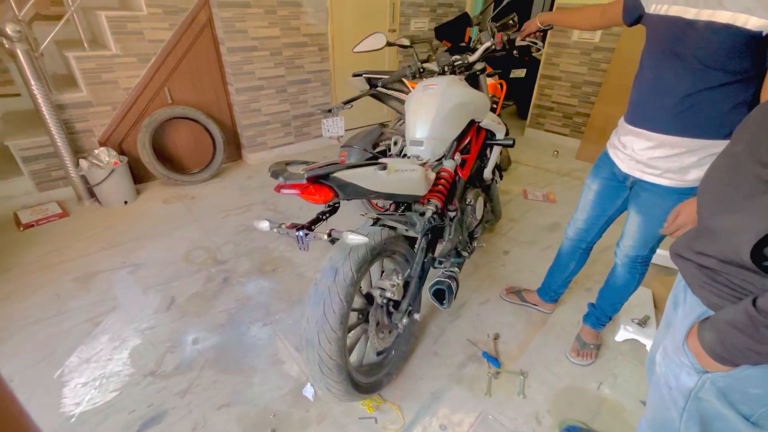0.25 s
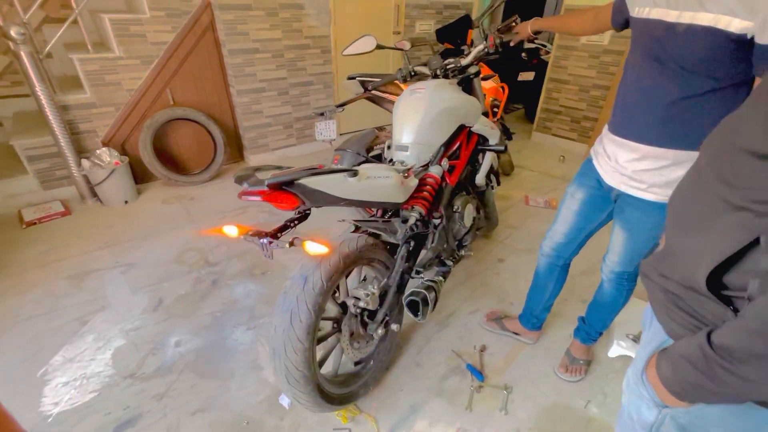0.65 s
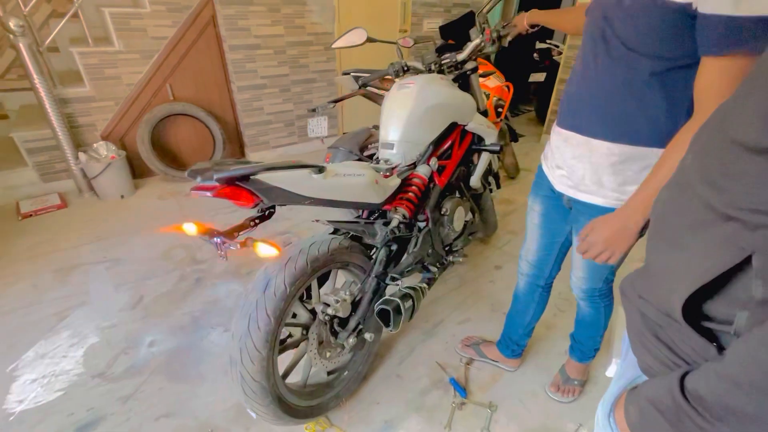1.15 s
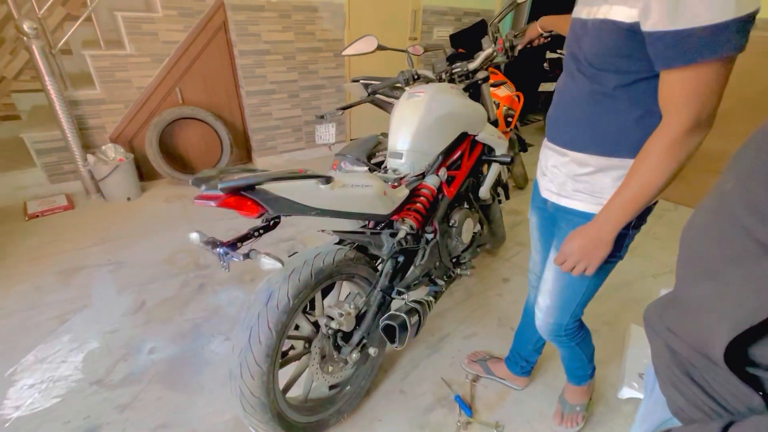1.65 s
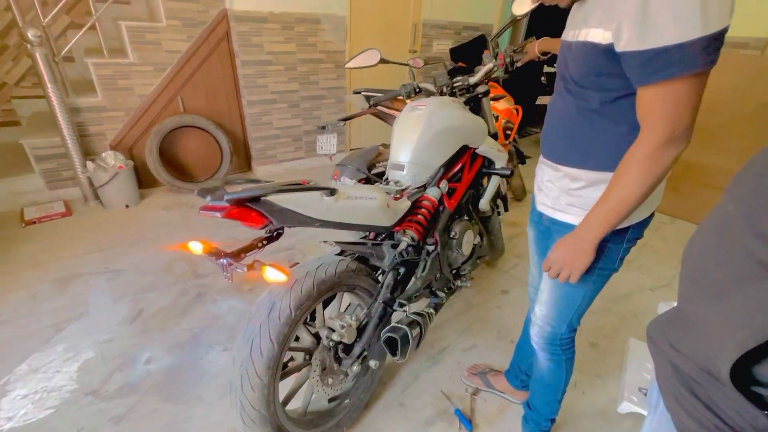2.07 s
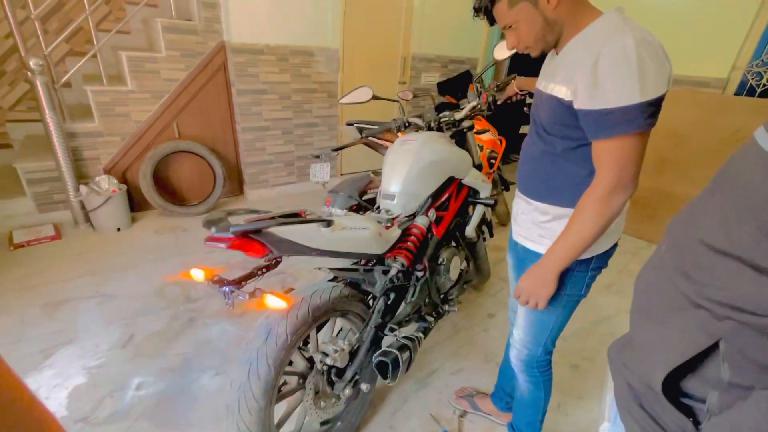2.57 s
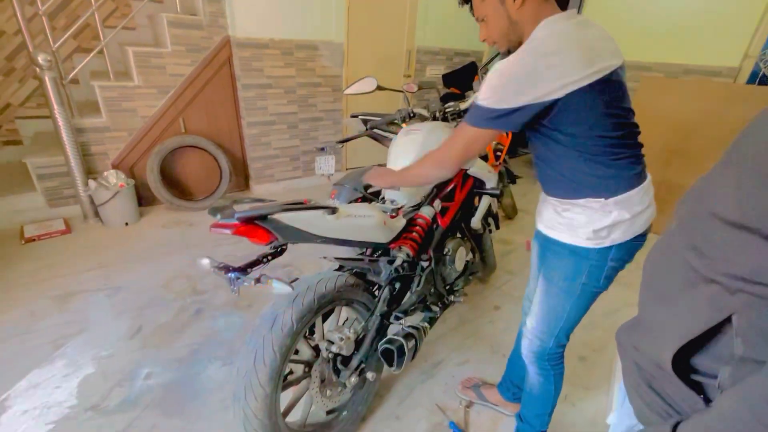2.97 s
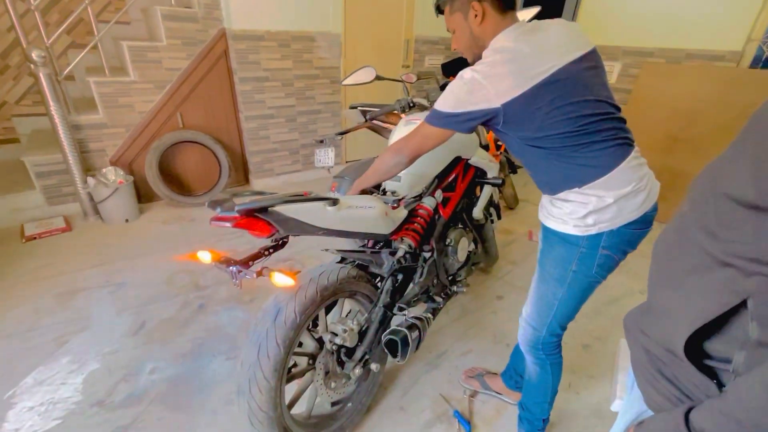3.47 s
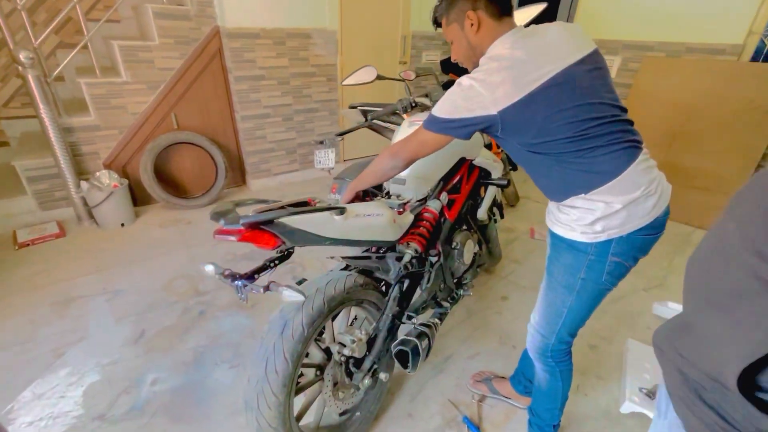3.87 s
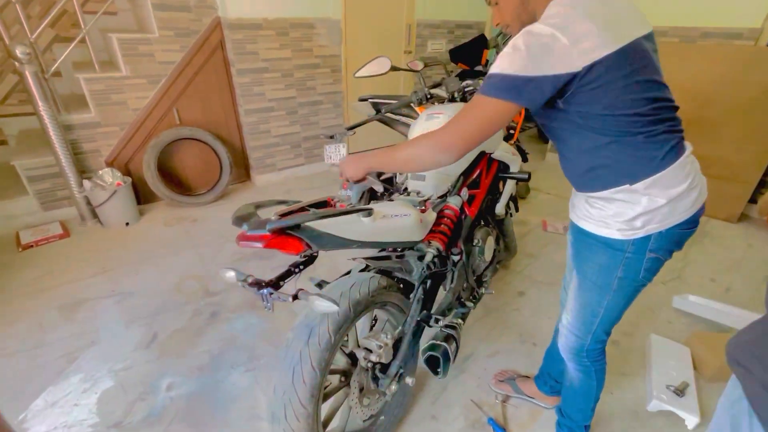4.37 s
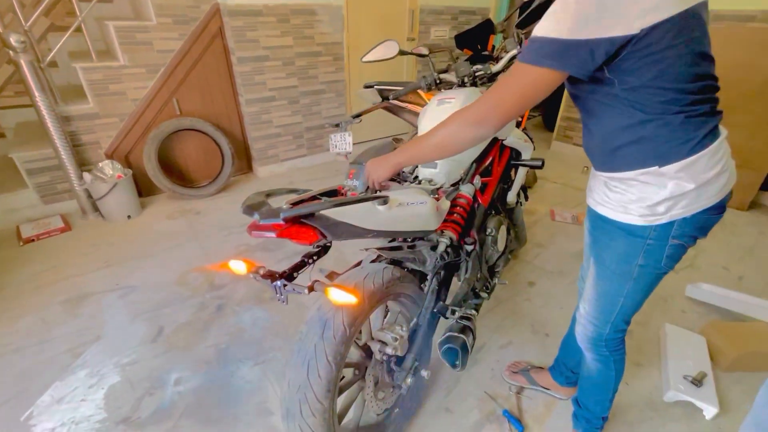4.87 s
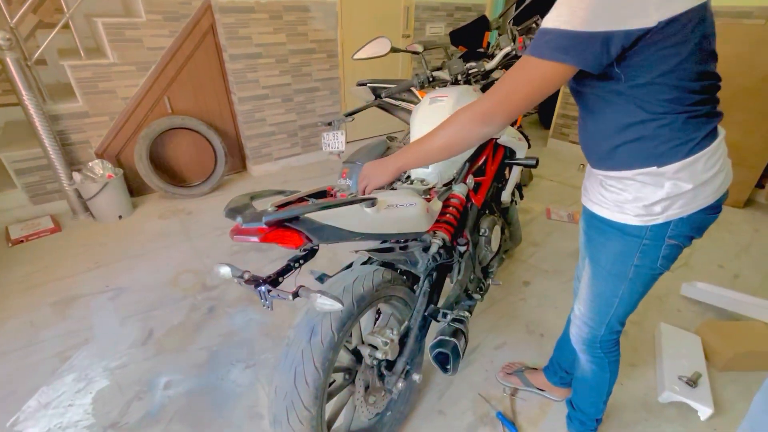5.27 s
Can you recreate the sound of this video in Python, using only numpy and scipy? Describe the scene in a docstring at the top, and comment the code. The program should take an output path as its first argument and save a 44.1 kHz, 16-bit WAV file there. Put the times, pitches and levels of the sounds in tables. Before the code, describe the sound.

A twin-cylinder motorcycle winds down toward idle, then is revved three times in quick succession through a loud open exhaust. Each blip rises in pitch with a boom, a bark and sharp spitting over a rush of gas. The engine sinks to a throbbing idle with a few lone pops, then gets three more blips. The hard-walled garage echoes and rings low, heard in stereo.

```python
"""A twin-cylinder motorcycle idles and is revved six times through an open pipe in a hard-walled garage.
Each exhaust stroke pushes out gas, making low tones and a throb over a steady rush and hiss.
When the stroke carries burnt fuel (the charge), it adds a boom, a bark and a short, sharp spit.
As the engine slows with the throttle shut, only a few lone pops fire. The garage echoes and rings
at its own low notes, and two microphones hear it differently."""
import sys
import numpy as np
from scipy import signal
from scipy.fft import rfft, irfft
from scipy.io import wavfile
from scipy.ndimage import uniform_filter1d

SR = 44100
rng = np.random.default_rng(int(sys.argv[2]) if len(sys.argv) > 2 else 0)


def unload_audio(sound):
    """Save the sound as a 16-bit wav file, at the path given as the first command line argument."""
    columns = np.transpose(np.atleast_2d(sound))
    # keep every value between -1 and 1, then stretch to whole-number steps
    steps = np.round(np.clip(columns, -1, 1) * 32767)
    wavfile.write(sys.argv[1], SR, steps.astype(np.int16))


N = 243431
T = np.arange(N) / SR

# Twists of the throttle: opens/s, full/s, eases/s, shuts/s, charge/dB (at opening, full, shutting),
# spit/dB (at the same three moments), boost of the second tone afterwards/dB
BLIPS = [(0.613, .78, 0.82, 0.92, -39, -11, -29.5, -48.5, -43.5, -62, 2.5),
         (1.115, 1.3, 1.356, 1.41, -29.5, -5.5, -17.5, -60.5, -38.5, -60, -1.5),
         (1.843, 2.056, 2.135, 2.235, -30, -3, -22, -61, -32, -64, 1.5),
         (3.92, 4.208, 4.25, 4.373, -40.5, -1.5, -39.5, -65.5, -32.5, -64, 3),
         (4.591, 4.646, 4.753, 4.893, -9.5, -2.5, -10, -55, -31, -52, 3.5),
         (5.334, 5.404, 5.5, 5.6, -13.5, -2, -3, -47, -33, -44, .1)]


def gain_of(db):
    """Turn decibels into a factor to multiply by."""
    return 10 ** (np.asarray(db) / 20)


def read(points, hz):
    """Look up a pitch in a table, joining its points with straight lines on an octave scale."""
    f, value = np.transpose(points)
    return np.interp(np.log(hz + 1), np.log(f + 1), value)


def coloured(x, points):
    """Shape a sound's lows and highs; the table sets their balance, not the overall loudness."""
    hz = abs(np.fft.fftfreq(8192, 1 / SR))
    log_gain = np.log(gain_of(np.maximum(read(points, hz), -100)))
    taps = np.fft.ifft(np.exp(np.conj(signal.hilbert(log_gain)))).real[:4096]  # rings only after a hit
    return signal.oaconvolve(x, taps / np.linalg.norm(taps))[:N]


def passed(x, hz, kind):
    """Keep only the "low" or the "high" side of a frequency."""
    return signal.sosfilt(signal.butter(4, hz, kind, fs=SR, output="sos"), x)


def speed():
    """How many exhaust strokes the engine makes each second."""
    # Engine speed: t/s, stroke rate/Hz
    rates = [(0, 71.76), (.2, 54.72), (.332, 46.1), (.451, 31.54), (.605, 28.91), (.806, 71.99),
             (.871, 78.18), (.975, 69.78), (1.13, 49.73), (1.196, 59.17), (1.337, 93.66), (1.397, 101.5),
             (1.797, 57.57), (1.86, 49.95), (1.935, 62.35), (2.112, 108.9), (2.188, 118.0), (2.476, 81.38),
             (2.953, 35.2), (3.05, 27.1), (3.2, 27.1), (3.45, 28.7), (3.941, 28.8), (4.084, 58.96),
             (4.236, 99.79), (4.301, 112.67), (4.607, 79.77), (4.762, 118.12), (4.858, 136.18),
             (5.31, 79.19), (5.366, 81.5), (5.461, 109.14), (5.52, 117.33)]
    return np.interp(T, *np.transpose(rates))


def lively(idle_hz=29, per_octave=.62):
    """0 at idle, 1 when the engine runs fast."""
    return np.clip(per_octave * np.log2(speed() / idle_hz), 0, 1)


def crank():
    """The turning engine: a running count of strokes, and one click for each."""
    hz = speed()
    count = .865 + np.cumsum(hz) / SR
    strokes = np.diff(np.floor(count), prepend=0) * np.sqrt(SR / hz)  # same power at any speed
    return count, strokes


def charge(rise_bend=.57, fall_bend=1.1):
    """Charge and spit levels in dB: both grow as the throttle opens, sink, and stop when it shuts."""
    out = np.full((2, N), -200.)
    for opens, full, eases, shuts, *levels_db, _ in BLIPS:
        rise = np.clip((T - opens) / (full - opens), 0, 1) ** rise_bend
        fall = np.clip((T - eases) / (shuts - eases), 0, 1) ** fall_bend
        rows_db = [np.interp(rise + fall, [0, 1, 2], part) for part in (levels_db[:3], levels_db[3:])]
        out = np.where((T > opens) & (T <= shuts), rows_db, out)
    return out


def flow(sound, fade_db_per_s=144):
    """Strength of the gas flow: a steady floor, a part that follows speed and one that trails the charge."""
    # Rows for throb, rush and hiss: floor/dB, level at 80 Hz/dB, rise/dB per octave of speed,
    # level at full charge/dB, rise/dB per dB of charge
    flows = [(-28, -26.5, 5, -18, 2), (-48.5, -41.5, 12.5, -30, 0.4), (-69, -55.5, 11.5, -32, 4)]
    floor_db, base_db, octave_db, full_db, slope = flows[["throb", "rush", "hiss"].index(sound)]
    fade_db = fade_db_per_s * T
    lingering_db = np.maximum.accumulate(charge()[0] + fade_db) - fade_db
    speed_db = base_db + octave_db * np.log2(speed() / 80)
    parts_db = [np.full(N, floor_db), speed_db, full_db + slope * lingering_db]
    return np.linalg.norm(gain_of(parts_db), axis=0)


def waver(depth_db):
    """Uneven running makes a tone swell and sink, a little differently left and right."""
    drift = uniform_filter1d(uniform_filter1d(rng.standard_normal((3, N)), size=1500), size=1500)
    return gain_of(depth_db * (drift[0] + .78 * drift[1:]) / drift.std())


def pipe_tone(count, multiple, empty_db=-40):
    """The gas in the pipe sings at a multiple of the stroke rate."""
    # Multiples 1 to 4: level/dB, extra at full charge/dB, change/dB per octave of speed from 80 Hz
    tones = [(-2.5, 3, -5.5), (-5, -2, 0.5), (-14.5, 17, -3.7), (-15, 8, -2.5)]
    # How well pipe and garage carry a tone: f/Hz, level/dB
    carry = [(25, -53), (45, -24.5), (57, -23.5), (70, -27.5), (84, -22), (100, -27), (128, -29),
             (152, -15.5), (172, -20), (192, -13), (212, -17), (226, -18), (243, -26.5), (266, -20),
             (292, -25), (328, -18), (360, -38), (395, -12.5), (440, -15), (520, -21)]
    base_db, loaded_db, octave_db = tones[multiple - 1]
    level_db = read(carry, multiple * speed()) + base_db + octave_db * np.log2(speed() / 80)
    load = np.clip(1 - charge()[0] / empty_db, 0, 1)
    blips_done = np.searchsorted([row[3] for row in BLIPS], T)
    boost_db = np.array([0] + [row[-1] for row in BLIPS])[blips_done]
    coasting_db = boost_db * lively() * (load == 0) * (multiple == 2)
    level_db += uniform_filter1d(loaded_db * load + coasting_db, size=2000)
    wave = np.sin(2 * np.pi * multiple * count + multiple ** 2)
    return gain_of(level_db) * waver(depth_db=.4 + 1.3 * lively()) * wave


def uneven(strokes, spread_db):
    """No two strokes are equally strong."""
    return strokes * gain_of(spread_db * np.clip(rng.standard_normal(N), -2, 2))


def puffs(strokes, rise_s, fall_s):
    """A burst of noisy gas follows each stroke."""
    t = T[:2000]
    shape = (1 - np.exp(-t / rise_s)) * np.exp(-t / fall_s)
    return signal.oaconvolve(strokes, shape / np.linalg.norm(shape))[:N] * rng.standard_normal(N)


def garage_ring(x, build_s):
    """The garage's own low notes build up as echoes gather, then die away."""
    # The notes (wider ones die sooner): f/Hz, width/Hz
    notes = [(57, 11), (84, 13), (115, 15), (148, 9), (167, 9), (193, 10), (226, 8), (266, 7), (303, 10),
             (328, 8), (395, 7), (430, 9), (486, 8), (547, 10), (625, 11), (693, 12)]
    # How each note reaches the microphones: left/dB, right/dB, right phase/rad
    reach = [(13, 15, 0.23), (2.5, -2.5, 0.33), (-5.5, -8.5, -0.5), (-1.5, 3.5, 0.83), (3.5, -4.5, 0.73),
             (7, 2.5, 1), (4.5, -0.5, -1.55), (4.5, 1.5, 0.87), (-1, -5, 0.33), (1.5, -0.5, 0.77),
             (2.5, 0.5, 0.75), (2.5, -1, 1.7), (-5.5, 1.5, 1.44), (-17, -1, -0.7), (-1.5, -14.5, 2),
             (-11, -6.5, -1.3)]
    t, ring = T[:SR // 2], np.zeros((2, SR // 2))
    for k, ((hz, width), (left_db, right_db, phase)) in enumerate(zip(notes, reach)):
        swing = np.sin(2 * np.pi * hz * t + np.array([[0], [phase]]))
        fade = width * np.exp(-np.pi * width * t)
        ring += (-1) ** k * gain_of([[left_db], [right_db]]) * fade * swing  # neighbours flip sign
    ring *= 1 - np.exp(-t / build_s)
    return signal.oaconvolve(x[None], ring / np.linalg.norm(ring[0]), axes=1)[:, :N]


def throb(strokes, dull_hz=354.5, thin_hz=72.3):
    """Each stroke and the swirling gas behind it set the garage ringing."""
    # Colour of the throb: f/Hz, level/dB
    colour = [(40, -40), (80, -2), (140, 2.5), (220, -7.5), (330, -5), (420, -8.5), (520, -14.5),
              (800, -74)]
    thumps = uneven(strokes, spread_db=2.5)
    swirl = (1 - .25 * lively()) * gain_of(-5) * puffs(strokes, rise_s=.004, fall_s=.015)
    pulses = coloured(gain_of(-14) * flow("throb") * (thumps + swirl), colour)
    slow = (1 - lively()) * passed(pulses, dull_hz, "low")
    fast = lively() * passed(pulses, thin_hz, "high")
    return garage_ring(slow + fast, build_s=.003)


def walls(x, echo_db, right_lead_samples=5):
    """The direct sound arrives first, then many echoes off the hard walls."""
    # How long echoes last: f/Hz, time to fade by 60 dB/s
    fade_times = [(300, 0.45), (1000, 0.66), (3000, 0.25), (8000, 0.21), (14000, 0.04)]
    echoes = np.zeros((2, SR // 2))
    arrivals = np.arange(80, SR // 2 - 20, 20)
    arrivals = arrivals + rng.integers(0, 20, (2, len(arrivals)))
    np.put_along_axis(echoes, arrivals, rng.choice([-1., 1.], arrivals.shape), 1)
    hz, t, bands = signal.stft(echoes, SR, nperseg=256)
    fade = gain_of(-60 * t / read(fade_times, hz)[:, None])
    room = signal.istft(bands * fade, SR, nperseg=256)[1]
    room *= gain_of(echo_db) / np.linalg.norm(room[0])
    room[[0, 1], [right_lead_samples, 0]] += 1  # the direct sound
    return signal.oaconvolve(x[None], room / np.linalg.norm(room[0]), axes=1)[:, :N]


def rush(thin_hz=733, idle_body=.42):
    """Gas rushes out of the pipe all the time; slow gas sounds thinner."""
    # Colour of the rush: f/Hz, level/dB
    colour = [(300, -41), (520, 8), (800, -1), (1200, -8), (2500, -17), (5000, -21), (6500, -48)]
    gas = coloured(flow("rush") * rng.standard_normal(N), colour)
    body = np.maximum(lively(), idle_body)
    return walls(body * gas + (1 - body) * passed(gas, thin_hz, "high"), echo_db=5)


def hiss():
    """The running engine hisses, louder when more gas flows."""
    # Colour of the hiss: f/Hz, level/dB
    colour = [(1800, 1.5), (3000, 11.5), (5800, 7.5), (6900, 4), (9000, 8), (10200, -0.5), (11200, 6),
              (12600, -7.5), (13300, -43), (15500, -51)]
    gas = gain_of(3) * flow("hiss") * rng.standard_normal(N)
    return walls(coloured(gas, colour), echo_db=.5)


def firings(strokes, sound):
    """A click for each burnt charge, with its strength for the bark, the spit or the boom."""
    # Rows for bark and boom: level at full charge/dB, rise/dB per dB of charge
    burn = [(-13.5, 1.4545), (-18, .5)]
    # Firings at idle: bark/dB, spit/dB, boom/dB
    idle_db = [-64.5, -61.5, -69]
    # Spells of idling: start/s, end/s
    idle_spells = [(.44, .612), (3.09, 3.948)]
    # A gap where the idling engine fails to fire: start/s, end/s
    misfire = (.51, .54)
    # Lone firings as the engine slows: t/s, bark/dB, spit/dB, boom/dB
    pops = [(0.157, -48, -77, -33), (0.374, -66, -55, -32.5), (1.123, -52, -79, -29.5),
            (2.913, -62, -58, -38.5), (3.038, -62, -56, -69)]
    column = ["bark", "spit", "boom"].index(sound)
    charge_db, spit_db = charge()
    bark_db, boom_db = (full_db + slope * charge_db for full_db, slope in burn)
    boom_db += .92 * np.minimum(charge_db + 23, 0)  # below -23 dB of charge the boom drops faster
    revving = gain_of([bark_db, spit_db, boom_db][column])
    idling = sum((T > start) & (T < end) for start, end in idle_spells)
    idling *= (T < misfire[0]) | (T > misfire[1])
    clicks = strokes * (revving + idling * gain_of(idle_db[column]))
    for at_s, *levels_db in pops:
        clicks[round(at_s * SR)] += gain_of(levels_db[column]) * np.sqrt(SR / 40)
    return clicks


def boom(strokes):
    """Each burnt charge lands as a thud and kicks the garage's higher notes."""
    # Colour of the boom: f/Hz, level/dB
    colour = [(120, -29.5), (250, 1.5), (400, 4.5), (520, 2.5), (700, -1.5), (1100, -41)]
    kicks = coloured(uneven(firings(strokes, "boom"), spread_db=1.6), colour)
    return gain_of(-5) * (walls(kicks, echo_db=-5) + garage_ring(kicks, build_s=.002))


def bark(strokes):
    """A burnt charge leaves the pipe as a sudden jump in pressure and a ragged burst."""
    # The jump and its quick bounces inside the pipe: delay/s, factor
    paths = [(0, 1), (.0023, .55), (.0037, -.45)]
    # Colour of the bark: f/Hz, level/dB
    colour = [(250, -19.5), (450, -14), (700, 1), (790, -3.5), (860, -8.5), (1250, -5), (1450, -4.5),
              (1650, -4), (1950, -15.5), (3100, -18.5), (6000, -26.5), (8000, -89.5)]
    fired = uneven(firings(strokes, "bark"), spread_db=1.5)
    jumps = sum(factor * np.roll(fired, round(delay * SR)) for delay, factor in paths)
    blast = jumps + gain_of(-5) * puffs(fired, rise_s=.001, fall_s=.002)
    return walls(gain_of(-3.5) * coloured(blast, colour), echo_db=-4.5)


def spit(strokes):
    """Each firing spits gas for about a thousandth of a second."""
    # Colour of the spit: f/Hz, level/dB
    colour = [(2500, 3), (4500, -27), (5600, 2), (7100, -3.5), (8800, 1), (10200, -2), (11500, 5.5),
              (12800, -13), (13500, -39), (15500, -31)]
    fired = uneven(firings(strokes, "spit"), spread_db=2.6)
    bursts = puffs(fired, rise_s=.0005, fall_s=.0007)
    return walls(gain_of(-1.2) * coloured(bursts, colour), echo_db=-6)


def scene():
    """All that leaves the pipe, as heard in the garage."""
    count, strokes = crank()
    tones = sum(pipe_tone(count, multiple) for multiple in range(1, 5))
    return tones + throb(strokes) + boom(strokes) + bark(strokes) + rush() + spit(strokes) + hiss()


def record(dry, bass_cut_hz=46, treble_cut_hz=15800, ceiling=1.3):
    """Two microphones colour the sound differently, round off peaks and lose the extreme lows and highs."""
    # Balance between the microphones: f/Hz, left minus right/dB
    balance = [(60, -2.5), (98, -3.5), (160, -1.5), (260, -2), (420, -3), (680, -3.5), (1110, -6),
               (1800, -2.5), (2930, -4), (4760, -8), (7740, -3.5), (12600, 1.5)]
    # How far the right one's wave runs ahead: f/Hz, phase/rad
    right_lead = [(60, .15), (400, .3), (1000, .1), (8900, .1), (10600, 2.1), (12700, 4.4)]
    hz = np.fft.rfftfreq(N, 1 / SR)
    gains = gain_of(np.outer([.5, -.5], read(balance, hz)))
    shifts = np.exp(1j * np.outer([-.5, .5], read(right_lead, hz)))
    heard = irfft(rfft(dry) * gains * shifts, N)
    trimmed = signal.sosfilt(signal.butter(7, bass_cut_hz, "high", fs=SR, output="sos"), heard)
    rounded = ceiling * np.tanh(trimmed / ceiling)
    treble_cut = signal.firwin(511, treble_cut_hz, window=("kaiser", 9), fs=SR)
    return signal.oaconvolve(rounded, treble_cut[None], "same")


dry = scene()
out = record(dry)
unload_audio(out)
```